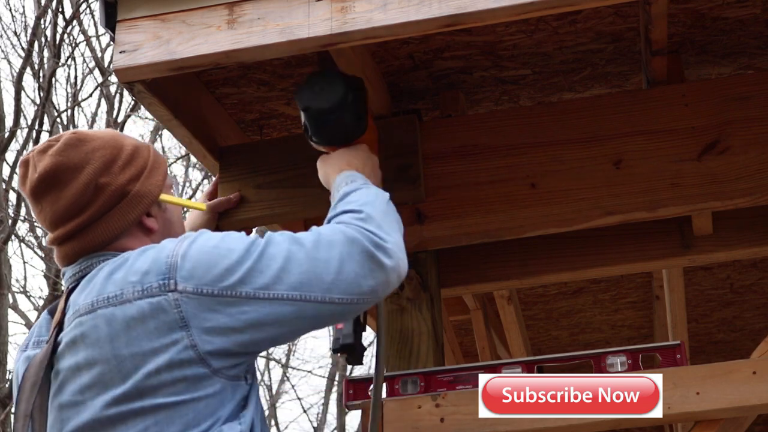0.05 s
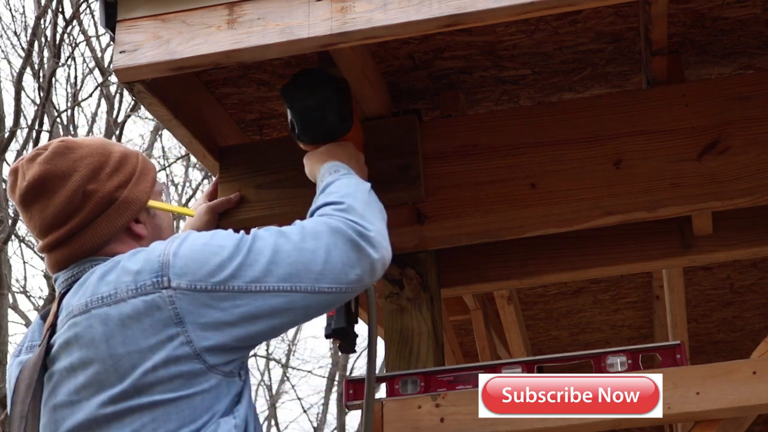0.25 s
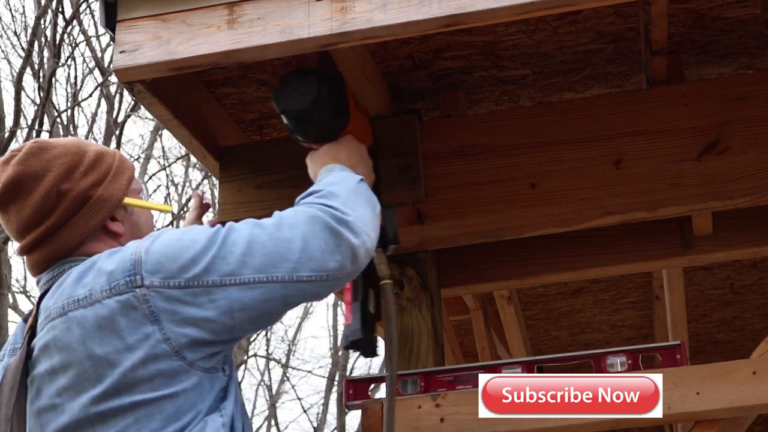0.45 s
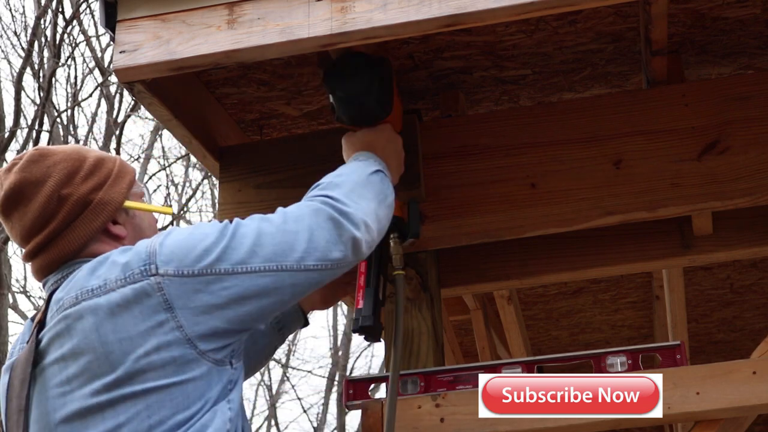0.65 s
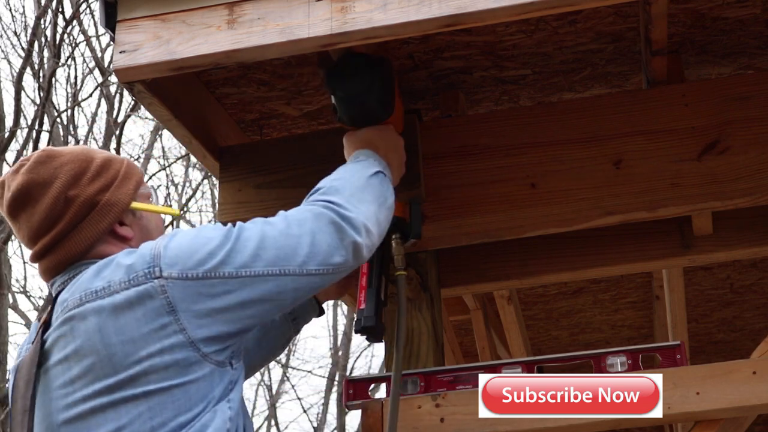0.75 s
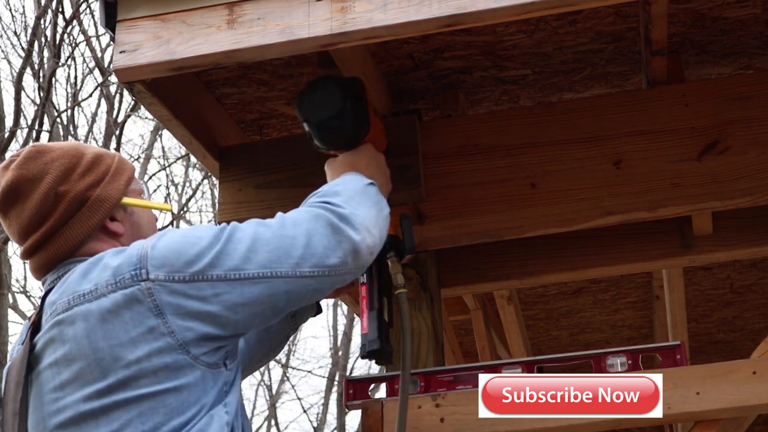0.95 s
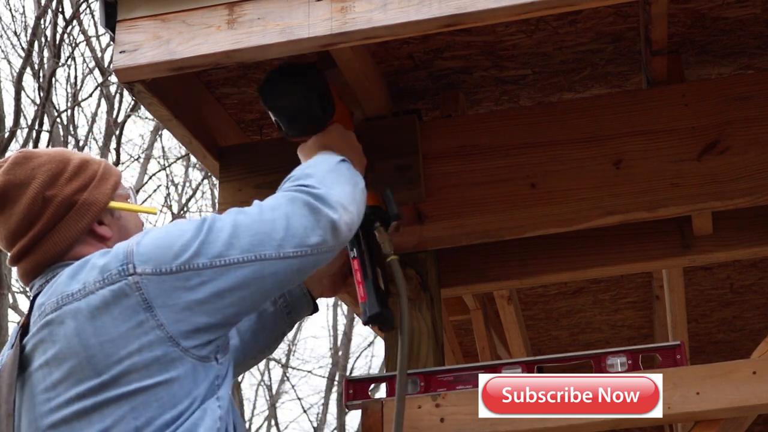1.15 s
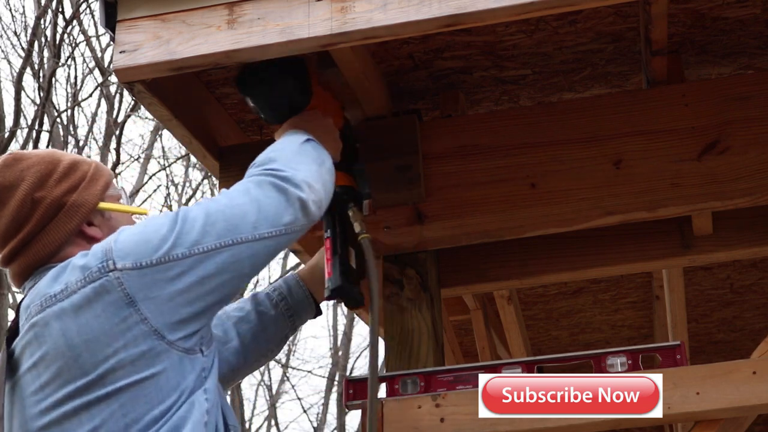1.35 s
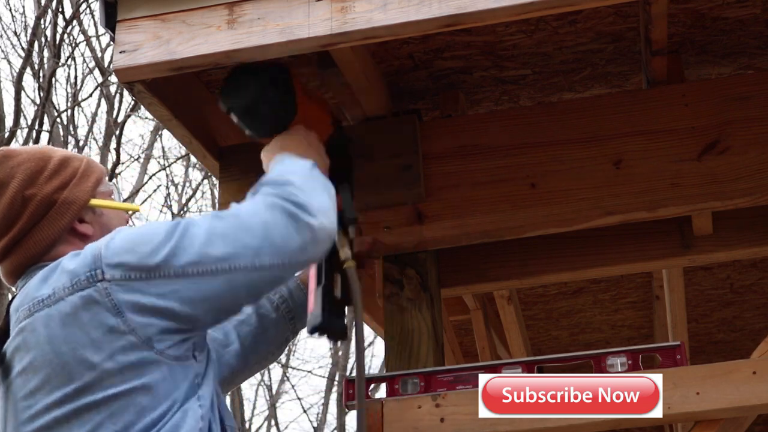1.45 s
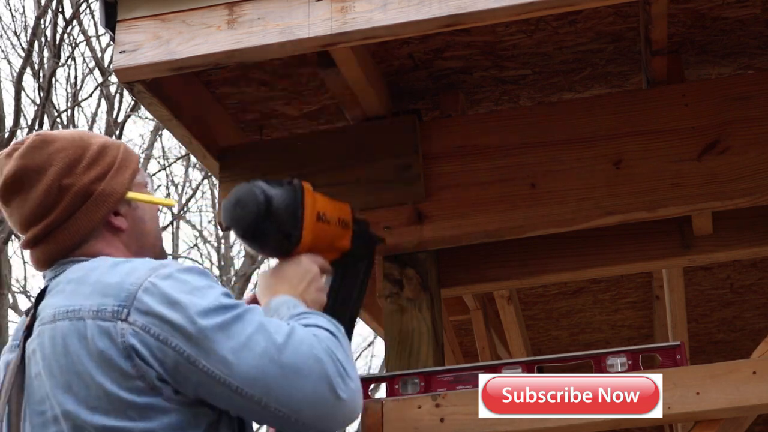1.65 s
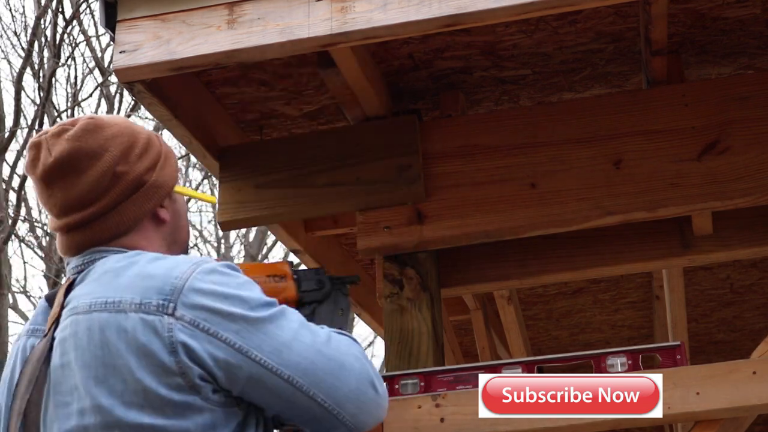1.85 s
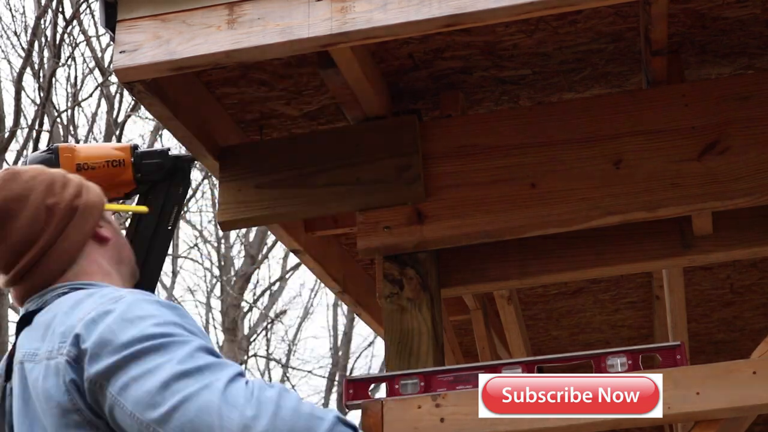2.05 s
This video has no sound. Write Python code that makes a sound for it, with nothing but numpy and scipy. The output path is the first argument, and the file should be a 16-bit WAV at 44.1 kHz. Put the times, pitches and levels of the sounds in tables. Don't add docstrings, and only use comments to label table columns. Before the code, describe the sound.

An air nailer fires three hard, evenly spaced shots into overhead timber, each a pop, crack and air burst. Loose steel rattles and knocks wood between them; trees scatter the echoes, heard from a few metres away.

```python
import sys
import numpy as np
from scipy import signal
from scipy.fft import rfft, irfft
from scipy.io import wavfile
from scipy.ndimage import uniform_filter1d

SR = 44100
rng = np.random.default_rng(int(sys.argv[2]) if len(sys.argv) > 2 else 0)


def level_to_linear(level):
    exponent = np.asarray(level, float) / 20
    return 10 ** exponent


def store_wav(level_fs):
    pcm = np.round(np.clip(np.atleast_2d(level_fs), -1, 1) * 32767)
    wavfile.write(sys.argv[1], SR, pcm.T.astype(np.int16))


N = 92610
PAD = int(.5 * SR)
VALVE_S = .004

# (frequency [Hz], level [dB])
OUTDOOR_SPECTRUM = [(12, -44), (20, -4), (130, -4), (270, -7.5), (388, -12), (499, -16.5), (542, -26),
                    (624, -20), (16000, -43)]
# (time [s], level [dB])
GUST = [
    (0, -15),
    (.7, -6),
    (1.4, 0),
    (2.1, -2.5),
]
# (frequency [Hz], echo level [dB], ring time T60 [s])
TREE_BANDS = [(155, -33, 0.77), (378, -14.5, 0.42), (638, -12.5, 0.52), (1115, -9, 0.33),
              (2130, -9.5, 0.63), (3530, -10, 0.5), (7000, -13.5, 0.52), (12300, -33, 0.27)]
# (time [s], level [dB])
JINGLE_LEVEL = [
    (1.862, -57),
    (1.88, -47),
    (1.91, -58),
    (1.95, -44),
    (2.0, -47.5),
    (2.03, -57),
    (2.06, -67),
]
# (frequency [Hz], width [Hz], level [dB])
STEEL_PARTS = [(3700, 400, -4), (4500, 400, -4), (5400, 350, 1), (6800, 600, -2), (10300, 900, 0)]
# (time [s], level [dB], ring time T60 [s], centre frequency [Hz])
RATTLES = [(0.2058, -37, 0.011, 5560), (0.2371, -17, 0.042, 5600), (0.2488, -18.5, 0.016, 6500),
           (.2697, -13, 0.013, 7900), (0.28, -47, 0.026, 7000), (.316, -39.5, 0.0098, 6000),
           (.3355, -43, .02, 4500), (0.36, -64, 0.012, 4000), (0.6909, -13.5, 0.018, 7000),
           (0.7041, -20, 0.041, 5560), (0.8068, -19, 0.014, 7000), (0.8114, -17.5, 0.01, 4900),
           (.8225, -54, 0.018, 8000), (0.9435, -11, 0.032, 8000), (0.963, -26, 0.045, 7900),
           (1.082, -11.5, 0.016, 5830), (1.115, -31, 0.014, 8850), (1.2344, -14.5, 0.023, 6500),
           (1.2383, -10, 0.011, 7000), (1.2467, -32, 0.026, 8160), (1.2483, -14, 0.043, 5560),
           (1.263, -32, 0.018, 9000), (1.2855, -20, 0.033, 7400), (1.307, -28.5, 0.041, 5200),
           (1.3932, -38.5, 0.034, 6000), (1.8193, -35.5, 0.01, 3950), (1.1015, -26, 0.016, 5600),
           (1.924, -42, .03, 6000), (1.945, -34.5, 0.04, 5870), (1.991, -56, 0.062, 5880)]
# (multiple of the lowest mode [1], level [dB], share of the ring time [1])
TIMBER_MODES = [(1, -5, 0.9), (1.35, -8.5, 0.62), (2.1, -11.5, 0.56), (3.6, -11.5, 0.91),
                (5.3, -15.5, 0.65)]
# (time [s], level
# [dB], ring time T60 [s], lowest mode [Hz])
KNOCKS = [(0.2387, -14.5, 0.078, 690), (.281, -25, 0.074, 770), (0.355, -32, 0.053, 780),
          (.6925, -11, 0.043, 632), (.7012, -10, .11, 321.4), (0.813, -15.5, 0.094, 887),
          (1.248, -24, 0.18, 654), (1.309, -23.5, 0.12, 287.4), (1.345, -31, 0.12, 268),
          (1.391, -24, 0.089, 610), (1.823, -22, 0.14, 933), (1.8205, -7, 0.051, 2610),
          (1.908, -21, 0.13, 807), (1.94, -29.5, 0.11, 662)]
# (frequency [Hz], level [dB])
SLAM_AIR = [(88, -22), (150, -13), (759, 15), (1690, 4), (2360, 7.5), (7920, 2), (8730, -27), (10600, 0),
            (16000, -42)]
# (frequency [Hz], width [Hz], level [dB])
SLAM_BODY = [(2270, 400, 0), (2850, 300, -2), (4300, 500, -4), (6370, 600, -4), (10600, 700, -2)]
# (frequency [Hz], level [dB], ring time T60 [s])
RAFTER_MODES = [(335, -9, .045), (512, -8, .05), (675, -11, .05), (897, -11, .045)]
# (frequency [Hz], level [dB])
EXHAUST_SPECTRUM = [(120, -46), (200, -5.5), (635, 0.5), (1140, -7.5), (3070, 1), (3370, -3.5),
                    (10700, 0.5), (16000, -5)]
# (time [s], level [dB], echo level [dB])
SHOTS = [
    (-.32, -5.5, -10.5),
    (.3731, -0.5, -6.5),
    (0.8619, -0.5, -7),
    (1.4258, -1, -8),
]


def unit(x):
    return x / np.sqrt(np.mean(x ** 2))


def band(x, hz, width):
    return signal.lfilter(*signal.iirpeak(min(hz, .45 * SR), hz / width, fs=SR), x)


def highpass(x, hz):
    return signal.lfilter(*signal.butter(2, hz, "high", fs=SR), x)


def colour(x, table):
    hz, db = np.array(table).T
    f = np.maximum(np.fft.rfftfreq(len(x), 1 / SR), 1)
    gain = level_to_linear(np.interp(np.log(f), np.log(hz), db))
    return unit(irfft(rfft(x) * gain, len(x)))


def fade(t, t60, hold=0., rise=0.00018):
    return np.clip(t / rise, 0, 1) * level_to_linear(-60 * np.clip(t - hold, 0, None) / t60)


def spiky(n, scatter_db):
    grains = np.repeat(rng.exponential(size=n // 12 + 1), 12)[:n]
    return unit(rng.standard_normal(n) * level_to_linear(scatter_db * grains))


def body(x, peaks):
    out = 0
    for k, (hz, width, db) in enumerate(peaks):
        out = out + (-1) ** k * level_to_linear(db) * band(x, hz, width)
    return unit(out)


def add(track, s, x):
    i = PAD + int(round(s * SR))
    track[i:i + len(x)] += x[:len(track) - i]


def outdoors():
    level_db, flicker_db = -46.5, 2.5
    x = colour(rng.standard_normal(N), OUTDOOR_SPECTRUM)
    gust_db = np.interp(np.arange(N) / SR, *np.array(GUST).T)
    k = int(SR / 9)
    out = 0
    for hz in 30 * 2. ** np.arange(10):
        walk = uniform_filter1d(np.repeat(rng.standard_normal(N // k + 1), k), k)[:N]
        gain_db = flicker_db * walk + gust_db * (hz < 200)
        out = out + level_to_linear(gain_db) * band(x, hz, 1.28 * hz)
    return unit(out) * level_to_linear(level_db)


def trees():
    rise_s, grain_db = 0.029, 2
    n = int(.8 * SR)
    t = np.arange(n) / SR
    swell = 1 - np.exp(-t / rise_s)
    out = 0
    for hz, db, t60 in TREE_BANDS:
        x = unit(band(band(spiky(n, grain_db), hz, 0.8 * hz), hz, 1.24 * hz))
        out = out + level_to_linear(db) * x * swell * fade(t, t60)
    return out


def jingle():
    ticks_per_s, centre_hz, smear_s = 290, 6500, 0.00077
    ticks = (rng.random(N) < ticks_per_s / SR) * level_to_linear(4.1 * rng.exponential(size=N))
    env = signal.lfilter([1], [1, -np.exp(-1 / (smear_s * SR))], ticks) + 0.9
    steel = unit(band(env * rng.standard_normal(N), centre_hz, 5700))
    s, db = np.array(JINGLE_LEVEL).T
    return steel * level_to_linear(np.interp(np.arange(N) / SR, s, db, -120))


def rattle(db, t60, hz):
    spike_db, steel_db, scatter_db = 2.5, -6, 3
    after_db, after_t60 = -19.5, 0.12
    width = 1.25 * hz
    n = int(.1 * SR)
    t = np.arange(n) / SR
    x = spiky(n, spike_db)
    parts = []
    for part_hz, part_width, part_db in STEEL_PARTS:
        detune, lift = rng.standard_normal(2)
        parts.append((part_hz * (1 + 0.014 * detune), part_width, part_db + scatter_db * lift))
    tone = band(band(x + level_to_linear(steel_db) * body(x, parts), hz, width), hz, width)
    env = fade(t, t60) + level_to_linear(after_db) * fade(t, after_t60)
    return level_to_linear(db) * unit(tone * env) / unit(env).max()


def knock(hz, t60):
    clean_below_hz, top_hz = 370, 3600
    rough_db, ring_db = -1, 5
    t = np.arange(int(.2 * SR)) / SR
    x = rng.standard_normal(len(t))
    out = 0
    for multiple, db, share in TIMBER_MODES:
        detune = 0.017 * rng.standard_normal() * (multiple > 1)
        f = hz * multiple * (1 + detune)
        clean = 1 / (1 + (f / clean_below_hz) ** 2)
        ring = level_to_linear(ring_db) * clean * np.sin(2 * np.pi * f * t)
        scrape = level_to_linear(rough_db) * (1 - clean) * unit(band(band(x, f, .5 * f), f, .5 * f))
        size = level_to_linear(db) / (1 + (f / top_hz) ** 2)
        out = out + size * (ring + scrape) * fade(t, t60 * share, 0., 0.00077)
    return out


def valve_hiss(t):
    hiss = unit(band(rng.standard_normal(len(t)), 10800, 5000))
    return level_to_linear(-18.5) * hiss * fade(t + VALVE_S, 0.03, VALVE_S, rise=.005)


def air_pop(t):
    swing = -level_to_linear(9) * np.sin(2 * np.pi * 1950 * t) * fade(t, .003, .00055, rise=.0001)
    puff = level_to_linear(-4) * colour(spiky(len(t), 1.5), SLAM_AIR) * fade(t, .022)
    return swing + puff


def driver_slam(t):
    level_db, ring_db = -2, -3
    x = spiky(len(t), 2.6)
    crack = colour(x, SLAM_AIR) + level_to_linear(ring_db) * body(x, SLAM_BODY)
    crack = highpass(crack * fade(t, .016, 0.0042), 900)
    thud = 0
    for hz, db, t60 in RAFTER_MODES:
        thud = thud + level_to_linear(db) * np.sin(2 * np.pi * hz * t) * fade(t, t60, 0., 0.00039)
    return level_to_linear(level_db) * (crack + thud)


def exhaust(t):
    return level_to_linear(-6) * colour(spiky(len(t), 1.6), EXHAUST_SPECTRUM) * fade(t, 0.15, 0.016, rise=0.0013)


def piston_return(t):
    return level_to_linear(-8) * unit(band(spiky(len(t), 2.5), 900, 1260)) * fade(t, .04)


def shot():
    slam_after_s, return_after_s = 0.00606, .036
    t = np.arange(int(.25 * SR)) / SR - VALVE_S
    air = valve_hiss(t) + air_pop(t)
    stroke = driver_slam(t - slam_after_s) + exhaust(t - slam_after_s)
    return air + stroke + piston_return(t - return_after_s)


def scene():
    handling_echo_db, mic_low_hz = -44, 170
    shots, handling = np.zeros(N + PAD), np.zeros(N + PAD)
    for s, db, echo_db in SHOTS:
        add(shots, s - VALVE_S, level_to_linear(db) * shot())
        add(shots, s, level_to_linear(echo_db) * trees())
    for s, db, t60, hz in RATTLES:
        add(handling, s, rattle(db, t60, hz))
    for s, db, t60, hz in KNOCKS:
        add(handling, s, level_to_linear(db) * knock(hz, t60))
    echo = level_to_linear(handling_echo_db) * signal.fftconvolve(handling, trees())[:N + PAD]
    near = highpass(shots + handling + echo, mic_low_hz)[PAD:]
    return (near + jingle() + outdoors())[None]


def top_cut(x):
    return signal.sosfilt(signal.butter(12, 16510, fs=SR, output="sos"), x)


def record(dry):
    duck_db, attack_s, hold_s, release_s = -17, .016, .045, .08
    top_hz = 15800
    t = np.arange(N) / SR
    gain_db = 0
    for s, *_ in SHOTS:
        dive = 1 - np.exp(-np.clip(t - s, 0, None) / attack_s)
        recovered = np.clip((t - s - hold_s) / release_s, 0, 1)
        gain_db = gain_db + duck_db * dive * (1 - recovered)
    x = np.clip(dry * level_to_linear(gain_db), -.97, .97)
    x = signal.sosfilt(signal.ellip(8, .2, 32, top_hz, fs=SR, output="sos"), x)
    return top_cut(x)


dry = scene()
out = record(dry)
store_wav(out)
```